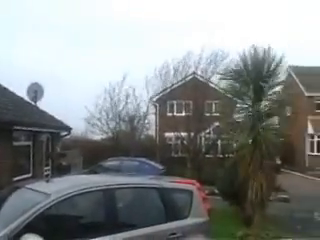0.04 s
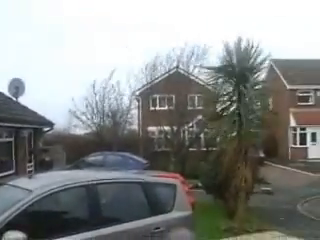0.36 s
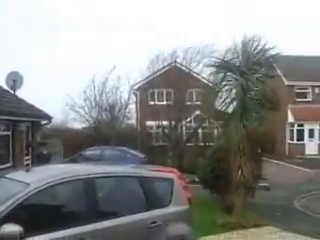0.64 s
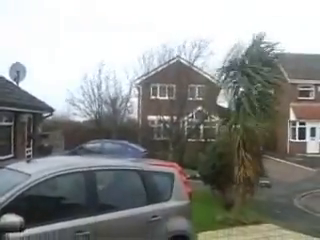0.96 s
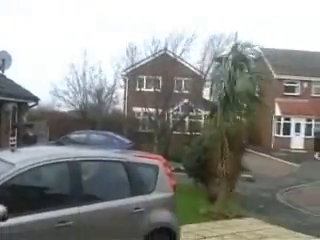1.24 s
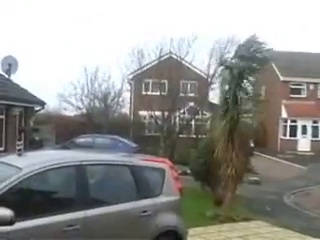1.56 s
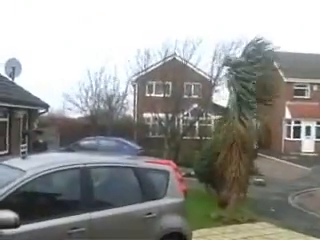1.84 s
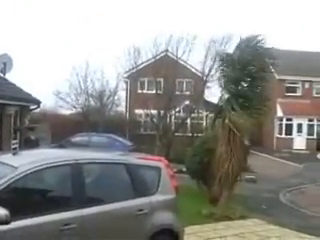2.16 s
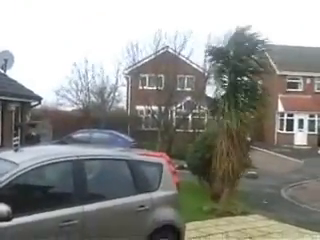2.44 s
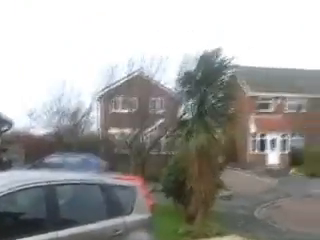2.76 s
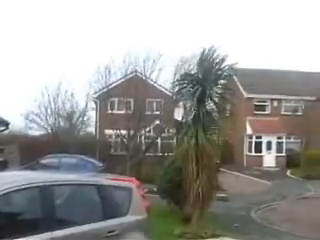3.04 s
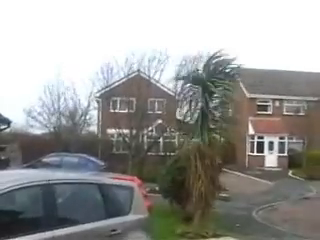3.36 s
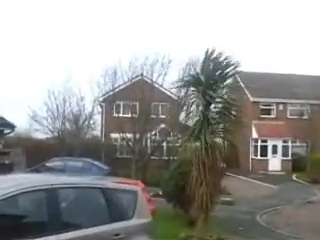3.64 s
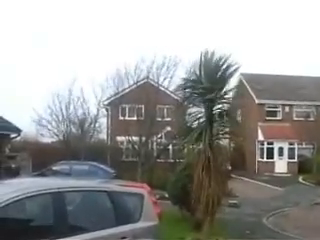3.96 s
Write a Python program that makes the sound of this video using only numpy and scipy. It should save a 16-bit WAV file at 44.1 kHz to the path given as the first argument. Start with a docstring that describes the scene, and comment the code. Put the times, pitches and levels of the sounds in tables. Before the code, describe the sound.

Strong wind roars along a residential street and hisses through a palm and bare trees. Ragged thumps and pops buffet the microphone, then ease before a wider gust swells with a faint hollow howl.

```python
"""Residential street in storm wind.
Gusts roar round the houses and hiss through a palm and bare trees; leaves patter and slap, with
brief thin whistles. Eddies strike the two microphone ports as ragged thumps, rasps and pops over
a weak rumble; air across the right port hoots. Last, a wider gust swells up with a hollow howl."""
import sys
import numpy as np
from scipy import signal
from scipy.fft import rfft, irfft, next_fast_len
from scipy.io import wavfile
from scipy.ndimage import uniform_filter1d, map_coordinates

SR = 44100
rng = np.random.default_rng(int(sys.argv[2]) if len(sys.argv) > 2 else 0)


def store_pcm(level_fs):
    """Save levels as 16-bit WAV."""
    pcm = np.round(np.clip(level_fs, -1, 1) * 32767).astype(np.int16)
    wavfile.write(sys.argv[1], SR, np.atleast_2d(pcm).T)


N = 176400

# wind round the houses (time [s], level [dB])
ROAR_LEVEL = [(0, -33.5), (.45, -31), (.9, -29.5), (1.3, -33), (1.5, -33), (1.8, -33), (2.12, -38),
              (2.35, -37.5), (2.7, -33.5), (2.9, -33), (3.2, -29.5), (3.41, -25.8), (3.68, -25.5),
              (3.76, -22.5), (3.86, -25), (4, -24.5)]
# (frequency [Hz], relative density [dB])
ROAR_SPECTRUM = [(30, -23), (80, 0.5), (150, -6.5), (230, 2), (310, -5.5), (400, 0), (480, -6), (700, -7),
                 (1250, -11.5), (2000, -15.5), (3000, -19.5), (6000, -27.5), (12000, -53)]
# (frequency [Hz], L/R correlation [1])
ROAR_COHERENCE = [(80, 0.74), (250, 0.98), (900, 0.98), (3000, 0.82)]
# wind through foliage (time [s], relative level [dB])
HISS_LEVEL = [(0.0, -49), (0.19, -44.5), (0.2, -41), (0.46, -36), (0.48, -37.5), (0.89, -37), (1.0, -39.5),
              (1.15, -41), (1.56, -38), (1.6, -38.5), (1.89, -46.5), (2.31, -42), (2.34, -47),
              (2.88, -44.5), (3.43, -37.5), (4.0, -36)]
# (frequency [Hz], relative density [dB])
HISS_SPECTRUM = [(500, 2.5), (1500, -5), (2800, -5.5), (4200, -1.5), (5500, -1), (7500, -2), (9500, -5.5),
                 (10700, -11), (12000, -31)]
# all leaf noise (frequency [Hz], L/R correlation [1])
LEAF_COHERENCE = [(2000, 0.81), (4500, 0.78), (7000, 0.54), (11000, 0.63)]
# leaf on leaf (frequency [Hz], relative density [dB])
CONTACT_SPECTRUM = [(1500, -2.5), (4000, -2.5), (8000, 2), (10000, 1.5), (12000, 3.5)]
# weak turbulence at the ports (time [s], level [dB])
DRAUGHT_LEVEL = [(0, -16.5), (.18, -29), (.45, -27.5), (.9, -26), (1.28, -31), (1.48, -38), (1.72, -32.5),
                 (2.12, -40), (2.29, -41), (2.6, -32.5), (2.85, -44), (3.3, -52), (3.7, -29), (4, -32)]
# port pressure (frequency [Hz], relative density [dB])
PORT_SPECTRUM = [(12, -35), (28, -8), (50, 1.5), (86, 6.5), (115, 6.5), (148, -4.5), (180, 0.5), (240, 0.5),
                 (300, -10.5), (355, -6.5), (445, -18.5), (510, -9.5), (600, -14.5), (850, -16.5),
                 (1400, -24.5), (2200, -39.5), (4000, -56), (9000, -78)]
# eddy strikes, each with its own depth (start [s], length [s], relative thump level [dB], relative flutter
# level [dB], L/R [dB], thump side/mid [dB], thump low cut [Hz])
EDDY_STRIKES = [(0, 0.036, -18, -20.5, -4.5, 12, 100), (0.098, 0.032, -10.5, -23, -4, 9.5, 70),
                (0.212, 0.091, -22.5, -35, 1.5, 4, 30), (0.331, 0.065, -15, -25, 2.5, 5.5, 40),
                (0.561, 0.014, -18, -24, 11, 8, 40), (0.579, 0.025, -15.5, -20.5, 9, 16, 70),
                (0.614, 0.037, -9, -19, 8.5, 18, 30), (0.769, 0.069, -16.5, -25.5, -0.5, 5.5, 50),
                (0.836, 0.09, -16.5, -20.5, 0.5, 7, 110), (0.94, 0.023, -15.5, -15.5, -5, 5, 139),
                (0.978, .03, -31, -28.5, 2, 8, 140), (1.012, 0.016, -18.5, -19, -3.5, 4, 100),
                (1.065, 0.042, -19.5, -23, -4, 4, 110), (1.109, 0.039, -16, -18.5, -2.5, 4.5, 50),
                (1.152, 0.021, -20, -21.5, -8, 19, 60), (1.188, 0.048, -20.5, -31, -6, 10, 190),
                (1.367, 0.037, -22.5, -29.5, -3, 5, 60), (1.414, 0.024, -25, -42, 11, 19, 40),
                (1.536, 0.024, -20, -26.5, -2.5, 5, 50), (1.567, 0.058, -13.5, -24, 1.5, 5.0, 107),
                (1.647, 0.012, -9, -20.5, -0.5, 9, 80), (1.691, 0.03, -27, -41, 0, 5, 40),
                (1.79, 0.025, -21, -31.5, -1, -2, 60), (1.815, 0.023, -11, -23.5, -1.5, 1.5, 139),
                (1.861, 0.013, -10, -22, -2, 2, 40), (1.891, 0.029, -11, -24, -1.5, 3.5, 150),
                (1.929, 0.08, -22.5, -30.5, 3, 10, 50), (2.056, 0.033, -22, -37, 7, 7, 40),
                (2.174, 0.012, -11.5, -22, -4, 2.5, 50), (2.36, 0.07, -27.5, -42, -7, 6, 40),
                (2.476, 0.014, -24.5, -35, -6.5, 9, 60), (2.539, 0.035, -22.5, -31, -2, 9.5, 50),
                (2.606, 0.056, -21, -29, -4, 11, 60), (2.652, 0.052, -31.5, -44, -2, 1, 40),
                (3.95, 0.06, -25.5, -41, 4, -4, 80)]
# air tearing at the ports (start [s], length [s], level [dB])
RASP_BURSTS = [(0.086, 0.013, -29.5), (0.582, 0.018, -37), (0.625, 0.033, -39), (0.948, 0.022, -34),
               (1.095, 0.033, -30), (1.16, 0.0074, -42), (1.819, 0.027, -34), (1.871, 0.0095, -23.5),
               (1.892, 0.017, -25.5), (2.177, 0.0071, -31)]
# (frequency [Hz], relative density [dB])
RASP_SPECTRUM = [(500, -2.5), (1100, 6), (1700, 5.5), (2300, -0.5), (3000, -13.5), (4000, -33), (8000, -60)]
# pressure pulses (start [s], pitch [Hz], relative peak [dB], L/R [dB], right port polarity [+1/-1])
PORT_POPS = [(0.0938, 805, -9, -12, -1), (0.118, 149, 0, 8, -1), (0.565, 180, -3.5, 10, -1),
             (.5845, 654, -5, 14, -1), (.59, 239, -9, 2, -1), (0.642, 260, -7, -1, -1),
             (.939, 446, -14, 10, -1), (1.015, 258, -1.5, -12, -1), (1.131, 300, -13, -10, -1),
             (1.1551, 560, -6, -7, -1), (1.8133, 262, 3, 14, 1), (1.8219, 300, -2.5, -3, 1),
             (1.861, 112, 0, -4, 1), (1.8734, 300, -5, 6, 1), (2.1737, 199, -6.5, -9, -1)]
# leaf slaps (start [s], length [s], level [dB], L/R [dB], high cut [Hz])
LEAF_SLAPS = [(0.377, 0.057, -42, -1, 9000), (.868, 0.035, -43, -1, 9000), (1.082, 0.0037, -34.5, 3, 9800),
              (1.553, 0.044, -48, -2, 10500), (1.576, 0.0036, -32.5, 0, 10500),
              (2.437, .008, -44, 11, 9800), (3.78, 0.15, -40, 4, 12000), (3.832, .004, -31.5, 1, 12990)]
# air tones in the trees (start [s], length [s], pitch [Hz], level [dB])
TREE_WHISTLES = [(1.361, 0.01, 5330, -38), (1.363, .009, 4740, -41), (3.395, .012, 5470, -37),
                 (3.435, 0.0097, 5480, -35), (3.46, .012, 5470, -44), (3.514, 0.015, 5520, -41),
                 (3.559, 0.023, 4360, -35), (3.584, 0.022, 5370, -38.5), (3.616, 0.019, 5250, -39)]
# air tones at the right port (start [s], length [s], pitch [Hz], level before pan [dB])
PORT_HOOTS = [(1.364, 0.02, 568, -23), (2.62, 0.031, 506, -24)]
# hollow note of the last gust (time [s], centre [Hz], level [dB])
HOWL_TRACK = [(2.699, 682, -57), (3.1, 750, -42.5), (3.351, 800, -42), (3.599, 850, -43), (3.78, 719, -35),
              (4, 788, -51)]

PORT_WIDTH_DB = 2.5  # side/mid of draught, flutter and rasp


def amp(db):
    """Decibels to gain."""
    return 10 ** (np.asarray(db) / 20)


def unit(x):
    """x at rms 1."""
    return x / np.sqrt(np.mean(x ** 2) + 1e-20)


def along(points, hz):
    """(Hz, value) points read on a log axis."""
    f, v = np.transpose(points)
    return np.interp(np.log(hz + 1), np.log(f + 1), v)


def curve(points):
    """(s, value) points as one value per sample."""
    return np.interp(np.arange(N) / SR, *np.transpose(points))


def wobble(rate_hz):
    """Smooth random curve, rate_hz knots a second."""
    return map_coordinates(rng.standard_normal(4096), [np.arange(N) * rate_hz / SR], mode="wrap")


def swell(start_s, length_s, rise_s, fall_s):
    """Envelope: exponential rise, hold, exponential fall."""
    t = np.arange(N) / SR - start_s
    return np.exp(np.maximum(np.minimum(t, 0) / rise_s - np.maximum(t - length_s, 0) / fall_s, -20))


def pan(db):
    """Constant-power gains, left db over right."""
    return unit(amp(np.array([[db], [-db]]) / 2))


def butter(x, order, hz, kind):
    """Butterworth filter."""
    return signal.sosfilt(signal.butter(order, hz, kind, fs=SR, output="sos"), x)


def filtered(x, response):
    """x through a frequency response."""
    size = 2 * next_fast_len(N // 2 + 4096)
    return irfft(rfft(x, size) * response(np.fft.rfftfreq(size, 1 / SR)), size)[..., :N]


def causal(spectrum):
    """Minimum-phase response: rings after a push, never before."""
    def response(hz):
        cepstrum = irfft(np.log(amp(along(spectrum, hz))))
        half = len(cepstrum) // 2
        fold = np.r_[1, np.full(half - 1, 2), np.zeros(len(cepstrum) - half)]
        return np.exp(rfft(cepstrum * fold))
    return response


def patchy_noise(spread_db):
    """Two noises with random gain patches in time and frequency."""
    bins = signal.stft(rng.standard_normal((2, N)), nperseg=512)[2]
    patches = uniform_filter1d(rng.standard_normal(bins.shape[1:]), size=4, axis=0)
    patches = uniform_filter1d(patches, size=10, axis=1)
    return signal.istft(bins * amp(spread_db * unit(patches)), nperseg=512)[1][:, :N]


def stereo(pair, spectrum, coherence):
    """Two noises shaped to a spectrum and L/R correlation, rms 1."""
    def response(hz):
        angle = np.arccos(np.clip(along(coherence, hz), -1, 1)) / 2
        return amp(along(spectrum, hz)) * [np.cos(angle), np.sin(angle)]
    mid, side = filtered(pair, response)
    return unit(np.array([mid + side, mid - side]))


def mid_side(pair, width_db):
    """Two signals as mid and side, rms 1."""
    mid, side = unit(pair[0]), unit(pair[1]) * amp(width_db)
    return unit(np.array([mid + side, mid - side]))


def burst(pair, envelope, width_db):
    """Enveloped stereo noise, rms about 1 during the hold."""
    on, out = np.flatnonzero(envelope > .001), np.zeros((2, N))
    out[:, on] = mid_side(pair[:, on] * envelope[on], width_db) * np.sqrt(np.mean(envelope[on] ** 2))
    return out


def roar():
    """Broad rush of wind round the houses."""
    rush = stereo(patchy_noise(spread_db=1.5), ROAR_SPECTRUM, ROAR_COHERENCE)
    return amp(curve(ROAR_LEVEL) + 1.1 * wobble(15)) * rush


def patter(rate_hz=110, fall_s=0.0088, spread_db=3.5, top_hz=9860):
    """Many small leaf contacts, each sudden and quickly gone."""
    rubbing = stereo(rng.standard_normal((2, N)), CONTACT_SPECTRUM, LEAF_COHERENCE)
    contacts = (rng.random((2, N)) < rate_hz / SR) * amp(spread_db * rng.standard_normal((2, N)))
    envelope = signal.lfilter([1], [1, -np.exp(-1 / (fall_s * SR))], contacts)
    return unit(envelope) * unit(butter(rubbing, 8, top_hz, "low"))


def foliage(gain_db=1.0, pan_db=1.5, patter_db=-10):
    """Wind through leaves and twigs: grainy hiss plus patter."""
    grains = patchy_noise(spread_db=2.07) * amp(0.63 * wobble(600))
    leaves = stereo(grains, HISS_SPECTRUM, LEAF_COHERENCE) + amp(patter_db) * patter()
    return amp(curve(HISS_LEVEL) + gain_db + 0.64 * wobble(25.26)) * pan(pan_db) * leaves


def turbulence(ragged_db, rate_hz):
    """Air at the ports: two noises in ragged, partly shared spurts."""
    spurts = wobble(rate_hz) + np.array([wobble(rate_hz), wobble(rate_hz)])
    return rng.standard_normal((2, N)) * amp(ragged_db * unit(spurts))


def draught():
    """Weak turbulence keeps the ports rumbling between eddies."""
    pressure = filtered(turbulence(ragged_db=1.5, rate_hz=79), causal(PORT_SPECTRUM))
    return amp(curve(DRAUGHT_LEVEL) + wobble(5)) * mid_side(pressure, PORT_WIDTH_DB)


def buffeting(air, split_hz=368, thump_gain_db=-1, flutter_gain_db=-2, sag_db=1.5):
    """Eddies strike the ports, hardest at the front: low thump, flutter above. Long ones die slower."""
    pressure = filtered(air, causal(PORT_SPECTRUM))
    lows, highs = butter(pressure, 4, split_hz, "low"), butter(pressure, 4, split_hz, "high")
    out = np.zeros((2, N))
    for start_s, length_s, thump_db, flutter_db, pan_db, width_db, cut_hz in EDDY_STRIKES:
        envelope = swell(start_s, length_s, rise_s=0.0039, fall_s=0.013 + 0.091 * length_s)
        envelope *= amp(curve([(start_s, sag_db / 2), (start_s + length_s, -sag_db / 2)]))
        push = butter(lows, 2, cut_hz, "high")
        thump = amp(thump_db + thump_gain_db) * burst(push, envelope, width_db)
        flutter = amp(flutter_db + flutter_gain_db) * burst(highs, envelope, PORT_WIDTH_DB)
        out += pan(pan_db) * (thump + flutter)
    return out


def rasps(air):
    """The hardest air tears at the ports in midrange bursts."""
    tearing = filtered(air, causal(RASP_SPECTRUM))
    out = np.zeros((2, N))
    for start_s, length_s, db in RASP_BURSTS:
        envelope = swell(start_s, length_s, rise_s=0.0015, fall_s=0.0036)
        out += amp(db) * burst(tearing, envelope, PORT_WIDTH_DB)
    return out


def pops(rise_cycles=0.06, fall_cycles=0.76, gain_db=-3.5):
    """The sharpest eddies: one pressure push, gone in a cycle or two."""
    out, t = np.zeros((2, N)), np.arange(SR // 10) / SR
    for start_s, hz, db, pan_db, polarity in PORT_POPS:
        cycles = t * hz * (1 + .04 * rng.standard_normal())
        envelope = np.exp(-cycles / fall_cycles) * (1 - np.exp(-cycles / rise_cycles))
        push = np.sin(2 * np.pi * cycles) * envelope
        ports = np.array([push, polarity * push]) / np.abs(push).max()
        onset = round(start_s * SR)
        out[:, onset:onset + len(t)] += amp(db + gain_db) * pan(pan_db) * ports
    return out


def slaps():
    """Leaves slap and brush together in bright bursts."""
    brushing = stereo(rng.standard_normal((2, N)), CONTACT_SPECTRUM, LEAF_COHERENCE)
    out = np.zeros((2, N))
    for start_s, length_s, db, pan_db, top_hz in LEAF_SLAPS:
        envelope = swell(start_s, length_s, rise_s=0.0043, fall_s=0.0088)
        out += amp(db) * pan(pan_db) * envelope * unit(butter(brushing, 8, top_hz, "low"))
    return out


def air_tones(rows, edge_s, waver_hz, rate_hz):
    """Brief sines of wavering pitch."""
    drift_hz = waver_hz * wobble(rate_hz)
    out = np.zeros(N)
    for start_s, length_s, hz, db in rows:
        phase = 2 * np.pi * np.cumsum(hz + drift_hz) / SR
        out += amp(db) * swell(start_s, length_s, edge_s, edge_s) * np.sin(phase)
    return out


def whistles():
    """Wind whistles thinly in the trees."""
    return air_tones(TREE_WHISTLES, edge_s=0.0027, waver_hz=65, rate_hz=410)


def hoots():
    """Air blows across the right port."""
    return pan(db=-26) * air_tones(PORT_HOOTS, edge_s=0.0055, waver_hz=46, rate_hz=83)


def howl(width_hz=260):
    """Hollow note: a wandering noise band that swells with the last gust."""
    time_s, centre_hz, db = np.transpose(HOWL_TRACK)
    phase = 2 * np.pi * np.cumsum(curve(np.c_[time_s, centre_hz])) / SR
    band = unit(wobble(width_hz) * np.cos(phase) + wobble(width_hz) * np.sin(phase))
    return amp(curve(np.c_[time_s, db])) * band


def scene():
    """Street plus wind on the microphone ports."""
    street = roar() + foliage() + slaps() + whistles() + howl()
    air = turbulence(ragged_db=3.0, rate_hz=380)
    return street + draught() + buffeting(air) + rasps(air) + pops() + hoots()


def record(dry, top_hz=12200):
    """Soft saturation of the hardest thumps, then a band limit."""
    saturated = dry / (1 + np.abs(dry) ** 8) ** (1 / 8)
    return filtered(saturated, lambda hz: hz < top_hz)


dry = scene()
out = record(dry)
store_pcm(out)
```